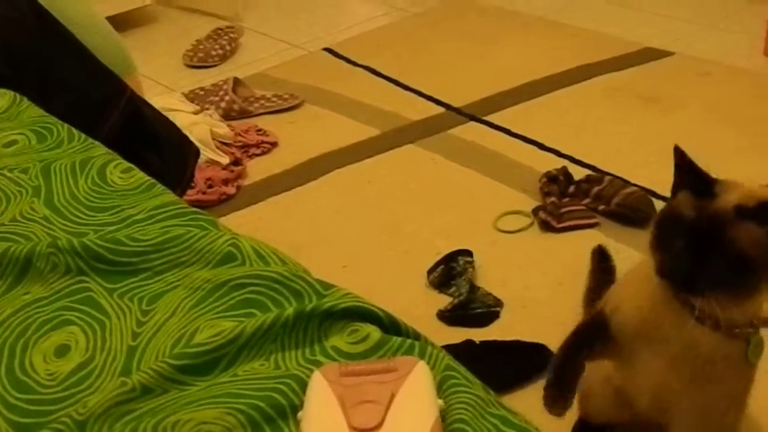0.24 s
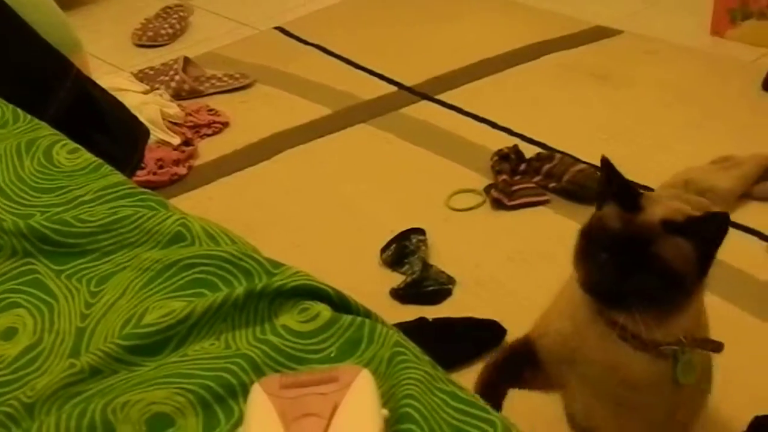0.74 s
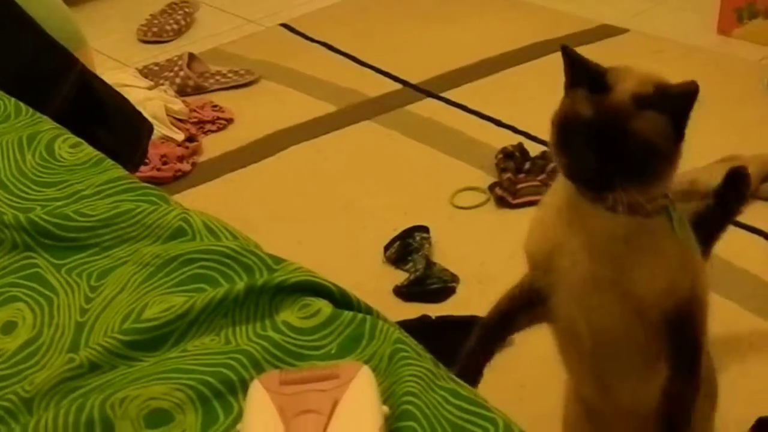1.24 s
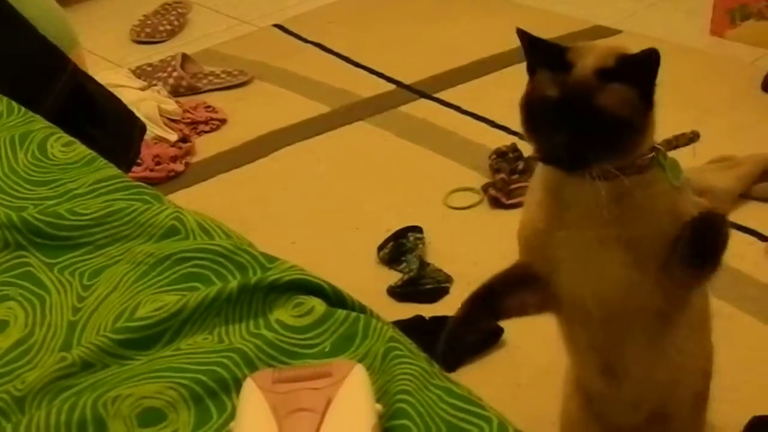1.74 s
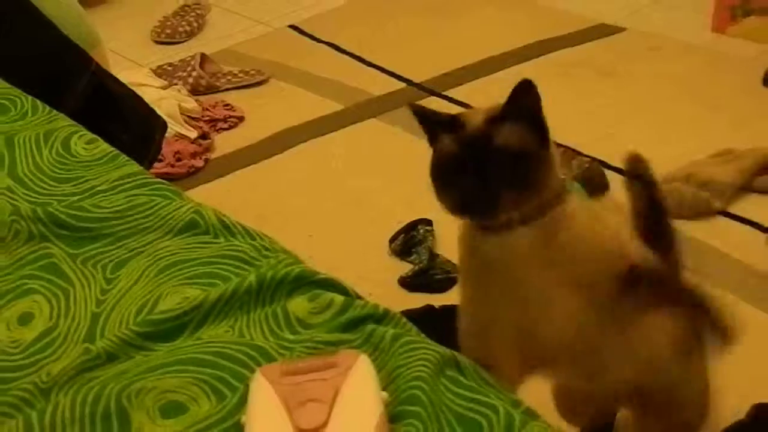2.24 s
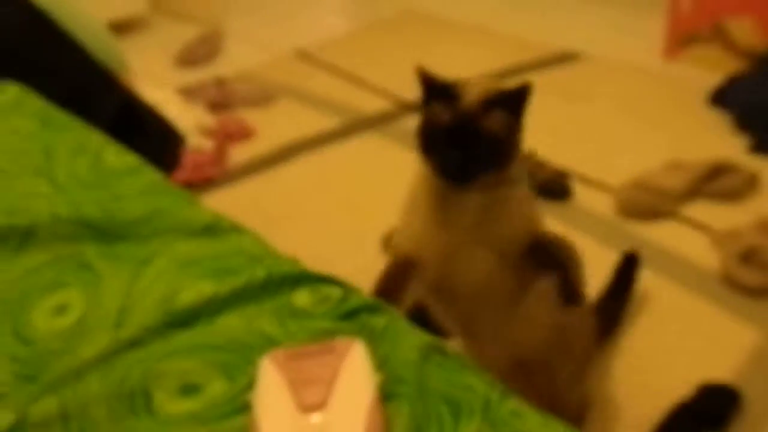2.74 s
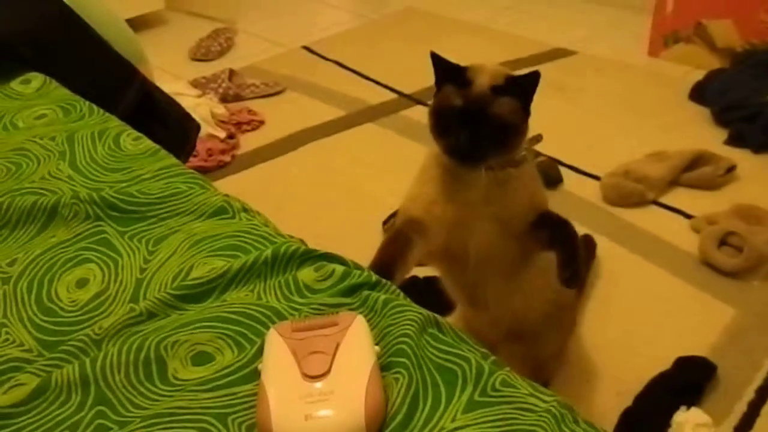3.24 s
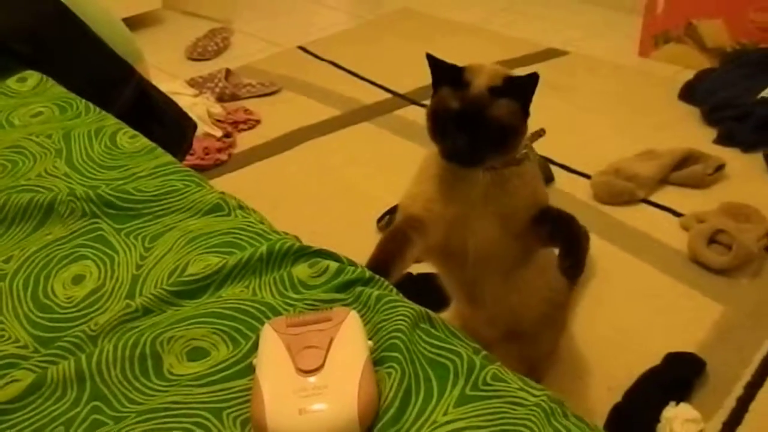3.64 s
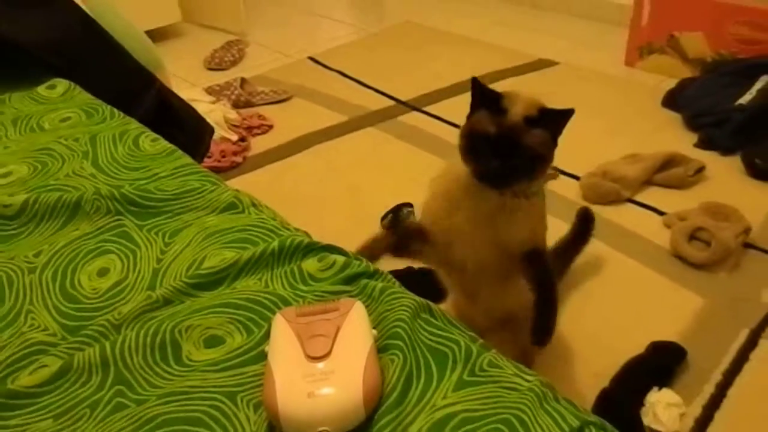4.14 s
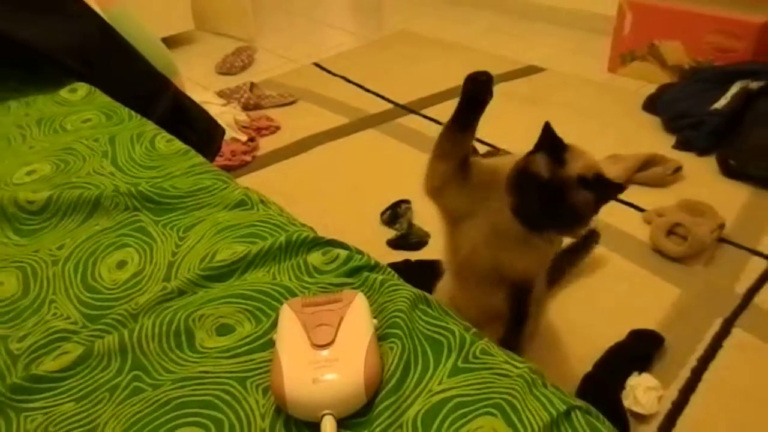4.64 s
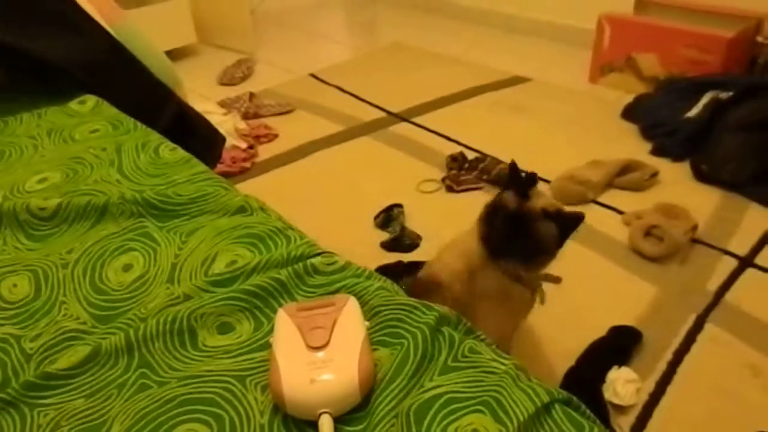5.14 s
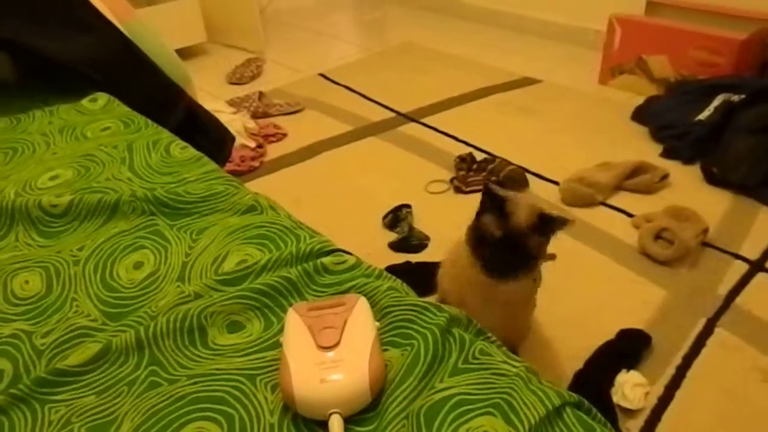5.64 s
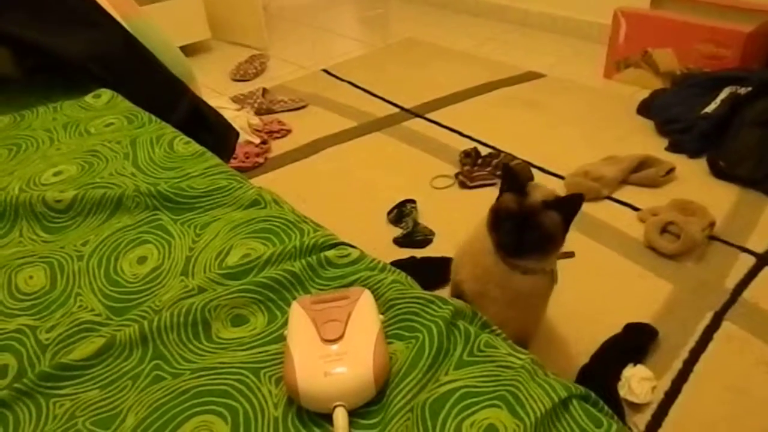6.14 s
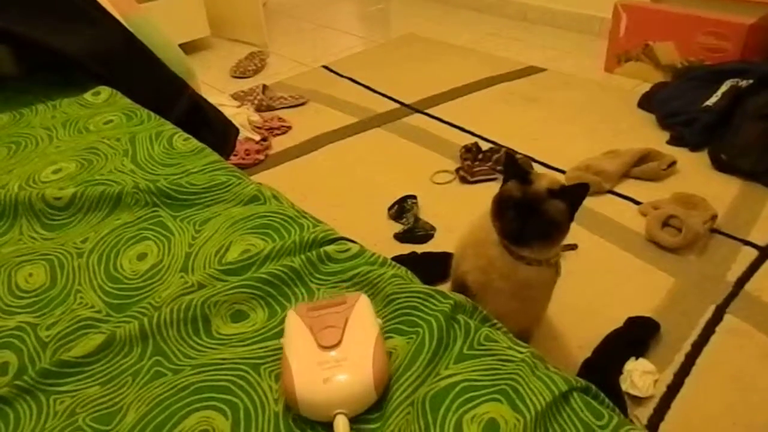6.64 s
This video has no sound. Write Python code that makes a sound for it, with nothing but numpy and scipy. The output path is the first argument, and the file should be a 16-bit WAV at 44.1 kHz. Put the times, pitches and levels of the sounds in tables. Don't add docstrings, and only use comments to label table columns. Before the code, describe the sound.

Constant high buzzing gear whine with a fine rattle; two quick clusters of soft paw thuds and sharp claw snaps land on hard floor indoors.

```python
import sys
import numpy as np
from scipy import signal
from scipy.fft import rfft, irfft, next_fast_len
from scipy.io import wavfile
from scipy.ndimage import uniform_filter1d, map_coordinates

SR = 44100
rng = np.random.default_rng(int(sys.argv[2]) if len(sys.argv) > 2 else 0)


def pcm_store(signal):
    levels = np.round(np.clip(np.atleast_2d(signal), -1, 1) * 32767)
    wavfile.write(sys.argv[1], SR, levels.astype(np.int16).T)


def volts_from_decibels(level):
    exponent = np.asarray(level, float) / 20
    return 10 ** exponent


N = 303408


def unit(x):
    return x / np.sqrt(np.mean(x ** 2) + 1e-20)


def along(points, hz):
    f, v = np.transpose(points)
    return np.interp(np.log(hz + 1), np.log(f + 1), v)


def curves(rows):
    s, *cols = np.transpose(rows)
    return [np.interp(np.arange(N) / SR, s, c) for c in cols]


def wobble(rate):
    knots = rng.standard_normal(512)
    return map_coordinates(knots, [np.arange(N) * rate / SR], order=1, mode="wrap")


def filtered(x, response):
    m = next_fast_len(N + SR // 2)
    return irfft(rfft(x, m) * response(np.fft.rfftfreq(m, 1 / SR)), m)[..., :N]


# t/s, f/Hz of drum order 76, level/dB of that order
RUN = [(0, 2696.2, -34), (.45, 2695.4, -33.4), (.85, 2694.8, -30.7), (1.5, 2696, -30), (2.2, 2697, -30.8),
       (3.3, 2697.8, -29.9), (4.0, 2697.2, -30), (4.7, 2699.8, -30.5), (5.0, 2699.4, -32.5),
       (5.4, 2699.4, -32.2), (5.6, 2700.8, -34), (6.1, 2699, -32.6), (6.5, 2697.6, -33.4),
       (6.88, 2697.6, -32.5)]


def drum_turns():
    tooth_hz = curves(RUN)[0] + 0.8 * wobble(5)
    return np.cumsum(tooth_hz) / 76 / SR


def tone(turns, db, sway_db, slip):
    phase = 2 * np.pi * turns + slip * wobble(25)
    return np.sqrt(2) * volts_from_decibels(db + sway_db * wobble(7)) * np.sin(phase)


# order, level/dB
DRUM = [(24, -60), (26, -54), (27, -49), (37, -57), (38, -54), (39, -55), (40, -50), (42, -56), (49, -53),
        (50, -49), (54, -55), (56, -57), (60, -54), (63, -52), (68, -53), (69, -48), (71, -49), (75, -49),
        (79, -41), (80, -46), (86, -49), (87, -46), (96, -48), (101, -51), (112, -51), (114, -53),
        (136, -52), (152, -54)]
# order, level/dB
DRUM_LOW = [(10, -55), (11, -59), (24.6, -56), (33.4, -57), (71.4, -53), (74, -51), (78, -47), (78.37, -50),
            (82, -51)]
# order, level/dB
MOTOR = [(6, -62), (7, -58), (9, -60), (10, -60), (14, -58), (18, -54), (30, -57), (31, -55), (32, -45)]
GEARING = 4.6016


def whine(drum, gain_db):
    motor = drum * GEARING
    t = np.arange(N) / SR
    teeth_db = curves(RUN)[1]
    motor_16_db = teeth_db - 5.5 + 0.49 * t
    motor_17_db = teeth_db - 6.5 + 0.95 * t
    swell = 1 + 0.2 * np.cos(2 * np.pi * drum)
    strong = swell * tone(30 * drum, -34 + gain_db, sway_db=0.53, slip=0.11)
    strong = strong + tone(20 * drum, -47 - 1.0 * t, sway_db=0.8, slip=0.37)
    locked = (
        (76 * drum, teeth_db),
        (16 * motor, motor_16_db),
        (17 * motor, motor_17_db),
        (76 * drum + motor, teeth_db - 11),
    )
    strong = strong + sum(tone(turns, db, sway_db=0.9, slip=0.2) for turns, db in locked)
    weak = 0
    for shaft, orders in ((drum, DRUM + DRUM_LOW), (motor, MOTOR)):
        for order, db in orders:
            weak = weak + tone(order * shaft + rng.random(), db, sway_db=1.5, slip=0.2)
    comb = uneven_teeth(drum, whole_db=-50.5, fifth_db=-62, scatter_db=3.0)
    return strong + volts_from_decibels(gain_db) * (weak + comb)


def uneven_teeth(drum, whole_db, fifth_db, scatter_db):
    order = np.arange(2049) / 5
    whole = np.arange(2049) % 5 == 0
    height, angle = rng.standard_normal((2, 2049))
    level = np.where(whole, whole_db, fifth_db) + scatter_db * np.clip(height, -3, 1)
    clear = [k for k, _ in DRUM + DRUM_LOW] + [20, 29, 30, 31, 76]
    fade = ~np.isin(order, clear) / (1 + (order / 150) ** 4)
    colour = shell_gain(order * 35.5)
    spectrum = volts_from_decibels(level) * fade * colour * np.exp(7j * angle)
    shape = irfft(spectrum) * 2048 * np.sqrt(2)
    return map_coordinates(np.tile(shape, 2), [drum / 5 % 1 * len(shape)], order=3)


def rattle(drum):
    pulse = 1
    for order, depth in ((2, 0.026), (3, 0.07), (6, 0.039), (12, 0.04)):
        pulse = pulse + depth * np.cos(2 * np.pi * order * drum)
    grit = rng.standard_normal((2, N)) * volts_from_decibels(0.6 * wobble(900) + 0.45 * wobble(5))
    hz, _, z = signal.stft(pulse * grit, SR, nperseg=2048)

    def texture(bins, frames):
        rough = rng.standard_normal(z.shape[1:])
        return unit(uniform_filter1d(uniform_filter1d(rough, size=bins, axis=0), size=frames, axis=1))

    depth_db = 1.9 / (1 + (hz[:, None] / 6500) ** 4) + 1.1
    comb_db = depth_db * texture(2, 40) + 0.5 * texture(16, 6)
    combed = signal.istft(z * volts_from_decibels(comb_db), nperseg=2048)[1][:, :N]
    return unit(filtered(combed, shell_gain))


# f/Hz, level/dB per Hz
SHELL = [(250, -33), (600, -20), (850, -17.5), (1500, -16), (2200, -10.5), (3250, -9.5), (4000, -4),
         (4550, -7), (5700, -8), (8000, -7.5), (11500, -8), (13000, -12), (14500, -13.5), (15800, -14.5)]
# f/Hz, width/Hz, boost level/dB
SHELL_RINGS = [(1137, 670, 8.5), (2822, 880, 8.5), (3580, 200, 2), (5120, 630, 8.5)]


def shell_gain(hz):
    rings = sum(db / (1 + (2 * (hz - centre) / width) ** 2) for centre, width, db in SHELL_RINGS)
    return volts_from_decibels(along(SHELL, hz) + rings)


def strike(out, s, sound):
    out[round(s * SR):][:len(sound)] += sound


# t/s, peak level/dB, thump f/Hz
THUDS = [(.75, -36, 100), (2.083, -22, 68), (2.096, -21, 150), (2.1071, -14, 175), (2.112, -21, 80),
         (2.126, -22, 85), (2.146, -26, 105), (2.169, -21, 95), (2.195, -33, 105), (2.221, -35, 110),
         (2.232, -29, 99), (2.258, -35, 100), (2.29, -37, 95), (2.503, -31, 100), (2.53, -35, 98),
         (4.823, -23, 68), (4.8281, -19, 196), (4.8393, -19, 195), (4.8458, -21, 95), (4.856, -20, 75),
         (4.868, -20.5, 95), (4.873, -24, 200), (4.883, -27, 100), (4.896, -32, 160), (4.914, -24, 105),
         (4.942, -32, 110), (5.03, -35, 105), (5.072, -35, 105)]


def thuds(out, t):
    for s, db, hz in THUDS:
        u = t * hz / 0.9
        load = u * np.exp((1 - u ** 2) / 2)
        strike(out, s, volts_from_decibels(db) * load * np.sin(2 * np.pi * hz * t))


# t/s, peak level/dB
SLAPS = [(2.0908, -16.5), (2.1065, -19), (2.1214, -16), (2.138, -24), (2.164, -29), (2.181, -31),
         (4.827, -18.5), (4.85, -24), (4.8638, -12.5), (4.8798, -23), (4.893, -25.5), (4.918, -34)]
# f/Hz, level/dB, decay time t60/s
TILE = [(256, -8, 0.042), (362, -3.5, 0.071), (447, -4, 0.044), (577, -11, 0.066)]


def slaps(out, t):
    rise = 1 - np.exp(-t / 0.00074)
    for s, db in SLAPS:
        ring = 0
        for hz, level, t60 in TILE:
            louder, sharper = rng.standard_normal(2)
            decay = volts_from_decibels(level + 2 * louder - 60 * t / t60)
            ring = ring + decay * np.sin(2 * np.pi * hz * (1 + 0.043 * sharper) * t)
        strike(out, s, volts_from_decibels(db) * ring * rise)


# t/s, peak level/dB, f/Hz
CLAWS = [
    (2.0912, -22, 1500),
    (2.1097, -12, 3000),
    (2.1195, -19, 2500),
    (2.1211, -9, 2500),
    (4.829, -21, 1600),
    (4.8639, -12, 2200),
    (4.8672, -14, 1700),
    (4.8797, -16, 1700),
    (5.19, -25, 700),
]


def claws(out, t):
    for s, db, hz in CLAWS:
        strike(out, s, -volts_from_decibels(db + 6 - 60 * t / 0.0022) * np.sin(2 * np.pi * hz * t))


def paws():
    out = np.zeros(N + SR)
    t = np.arange(SR // 4) / SR
    thuds(out, t)
    slaps(out, t)
    claws(out, t)
    return out[:N]


# f/Hz, t60/s
ROOM = [(60, 0.4), (120, 0.25), (400, 0.33), (2000, 0.4), (8000, .08)]


def room(x):
    hz, t, z = signal.stft(rng.standard_normal((2, SR // 2)), SR, nperseg=512)
    tail = signal.istft(z * volts_from_decibels(-60 * t / along(ROOM, hz)[:, None]), SR, nperseg=512)[1]
    padded = np.pad(tail, ((0, 0), (0, N)))[:, :N]
    tail = filtered(padded, lambda f: 1 / (1 + (f / 900) ** 2))[:, :SR // 2]
    return signal.fftconvolve(x[None], tail / np.linalg.norm(tail[0]), axes=1)[:, :N]


# f/Hz, level/dB per Hz
HUM = [(25, -32), (48, -9), (75, 0), (105, 2.5), (150, -2), (200, 0), (270, -13), (370, -3.5), (500, -4.5),
       (650, -43), (900, -21)]


def room_hum(gain_db):
    noise = filtered(rng.standard_normal((2, N)), lambda hz: volts_from_decibels(along(HUM, hz)))
    return unit(noise) * volts_from_decibels(-46 + gain_db + 1.2 * wobble(6.7))


# f/Hz, correlation
ALIKE = [(60, .8), (200, .75), (290, .5), (500, .55), (1000, .76), (3400, .74), (5000, .72), (7000, .52),
         (9000, .46), (11000, .2), (13000, .2), (15000, .56)]
# f/Hz, left minus right level/dB
LEAN = [(60, -1), (200, .5), (400, 3.2), (800, 4.3), (1400, 4), (3400, 2), (4200, 2.5), (6000, -1.2),
        (8000, -2.6), (11000, -3.9), (12000, -3), (13000, -.2), (15000, .6)]
# f/Hz, radians by which left leads
LEAD = [(300, 0), (1400, -.2), (2600, -.47), (5000, -.85), (6000, -.5), (10000, -.5), (12000, .9),
        (15000, .2)]


def ports(pair):
    def mix(hz):
        turn = np.arccos(np.clip(along(ALIKE, hz), 0, 1)) / 2
        half = volts_from_decibels(along(LEAN, hz) / 2) * np.exp(0.5j * along(LEAD, hz))
        left = [half * np.cos(turn), half * np.sin(turn)]
        right = [np.cos(turn) / half, -np.sin(turn) / half]
        return np.array([left, right])
    return filtered(pair[None], mix).sum(axis=1)


# t/s, depth level/dB
DUCKS = [
    (2.125, 1.5),
    (4.872, 3.4),
]


def duck_db():
    start, depth = np.array(DUCKS).T[:, :, None]
    t = np.maximum(np.arange(N) / SR - start, 0)
    fall_s, recover_s = 0.015, 0.12
    return -np.sum(depth * (1 - np.exp(-t / fall_s)) * np.exp(-t / recover_s), axis=0)


def scene():
    gain_db = duck_db()
    drum = drum_turns()
    tones = whine(drum, gain_db) * volts_from_decibels(1.06 + gain_db / 2)
    noise = room_hum(gain_db) + volts_from_decibels(-27.5 + gain_db) * rattle(drum)
    cat = paws()
    mid, side = room(cat) * volts_from_decibels([[-24], [-31]])
    landing = volts_from_decibels([[2.1], [-2.1]]) * np.array([cat + mid + side, cat + mid - side])
    return ports(tones * [[1], [0]] + noise) + landing


def band_limit(x):
    return signal.sosfilt(signal.butter(12, 15730, fs=SR, output="sos"), x)


def record(dry):
    bass_hz, top_hz = 52, 15730
    mix = filtered(dry, lambda hz: hz ** 4 / (hz ** 4 + bass_hz ** 4) * (hz < top_hz))
    return band_limit(mix)


dry = scene()
out = record(dry)
pcm_store(out)
```